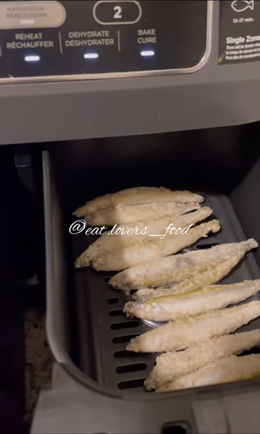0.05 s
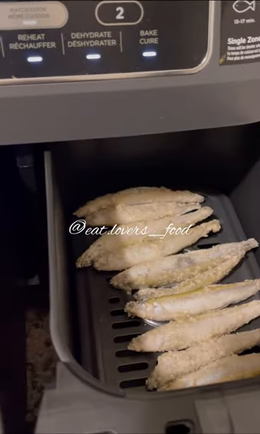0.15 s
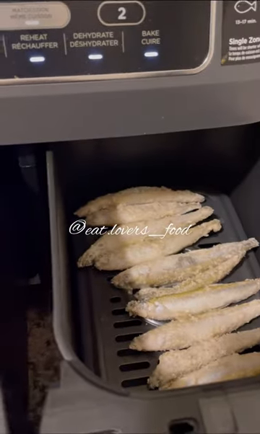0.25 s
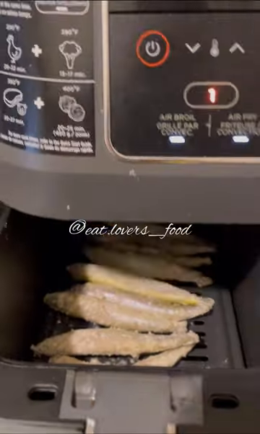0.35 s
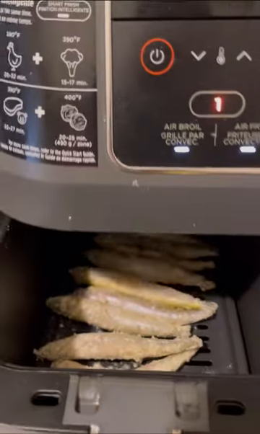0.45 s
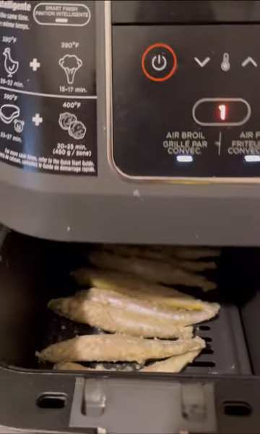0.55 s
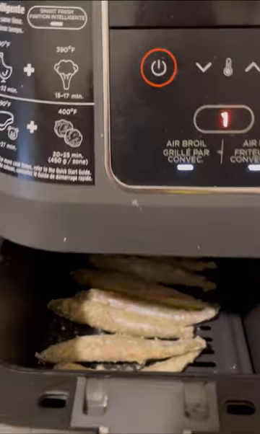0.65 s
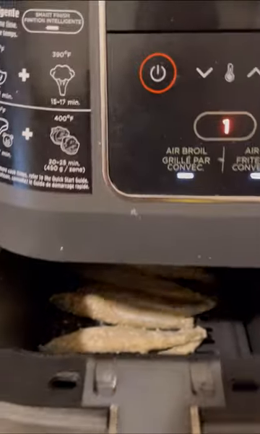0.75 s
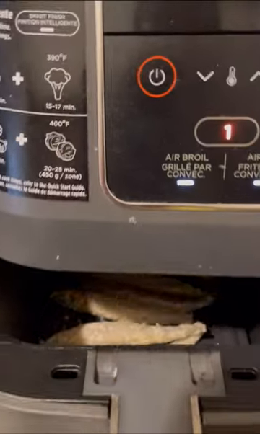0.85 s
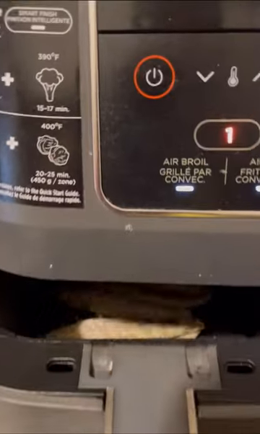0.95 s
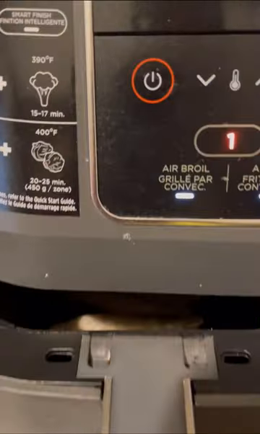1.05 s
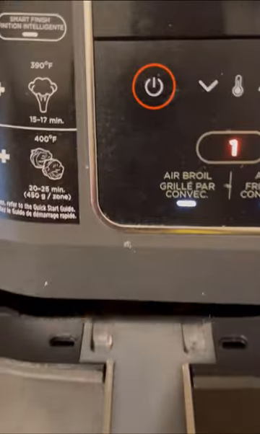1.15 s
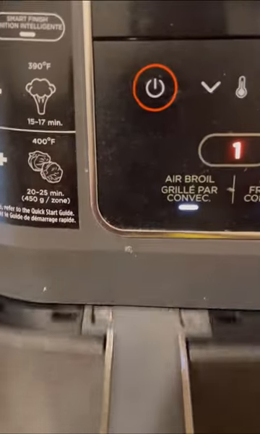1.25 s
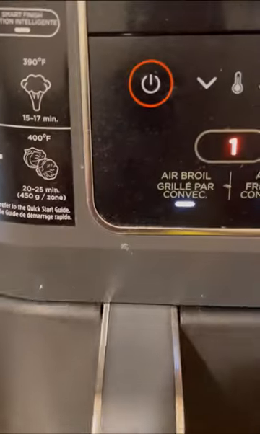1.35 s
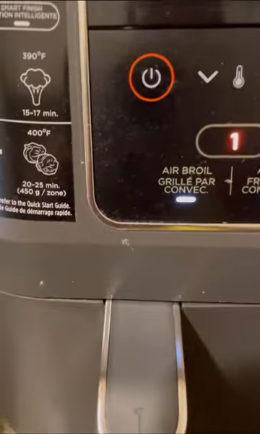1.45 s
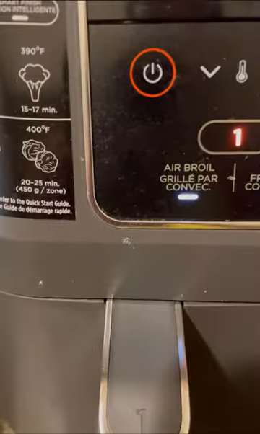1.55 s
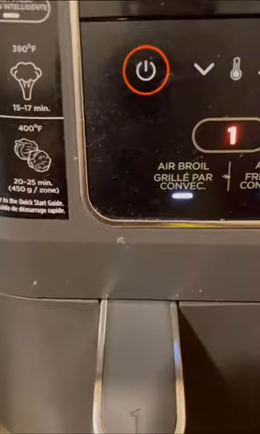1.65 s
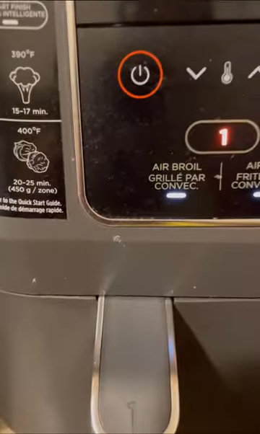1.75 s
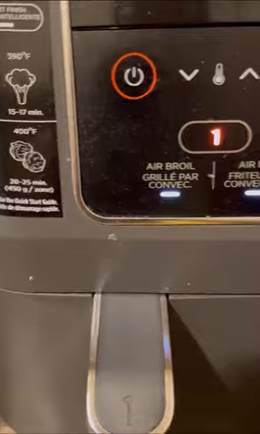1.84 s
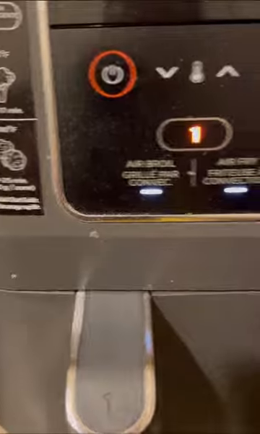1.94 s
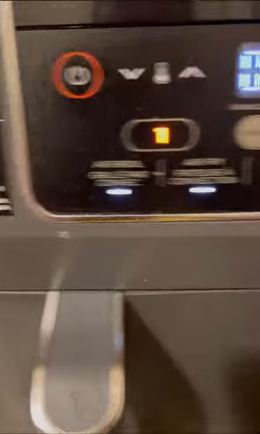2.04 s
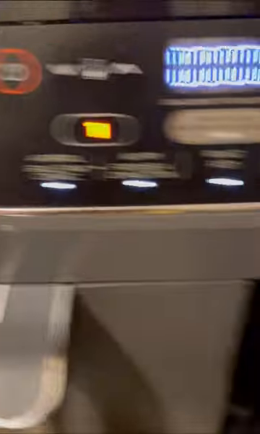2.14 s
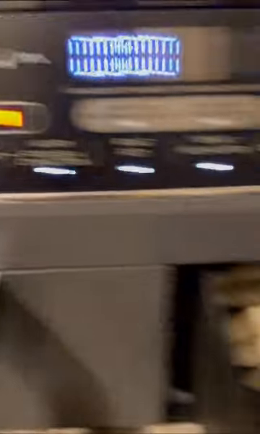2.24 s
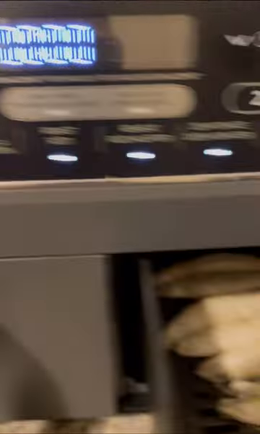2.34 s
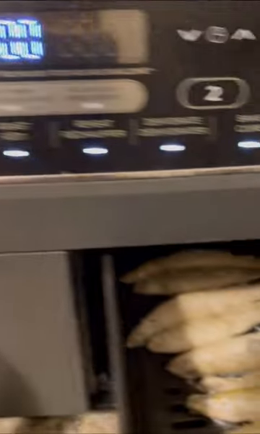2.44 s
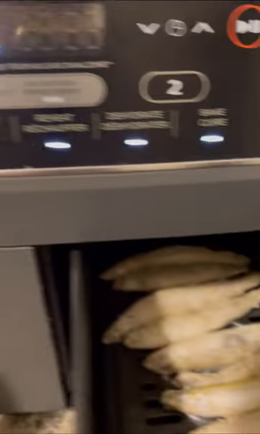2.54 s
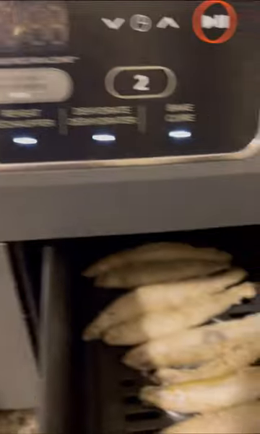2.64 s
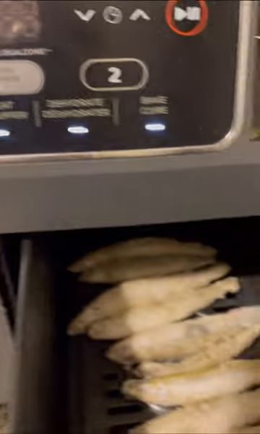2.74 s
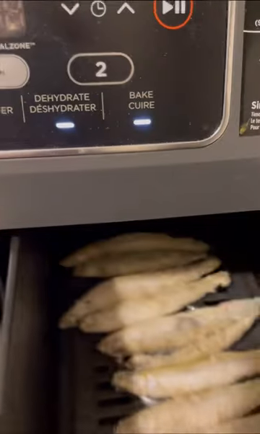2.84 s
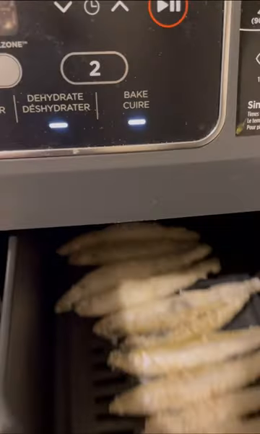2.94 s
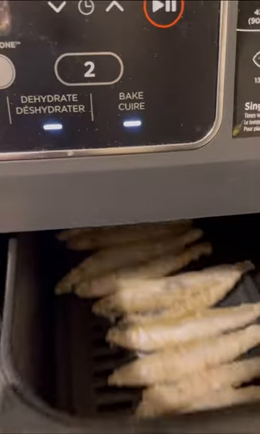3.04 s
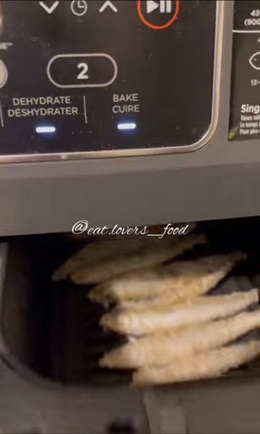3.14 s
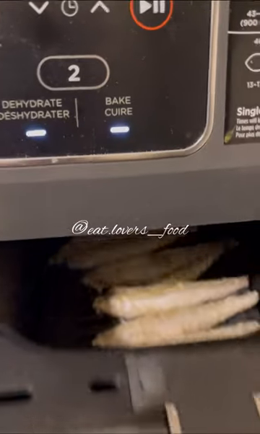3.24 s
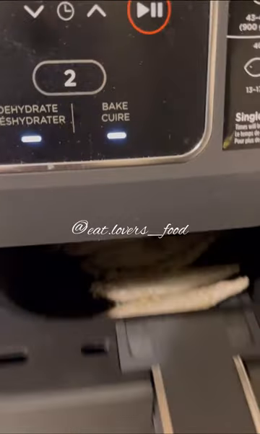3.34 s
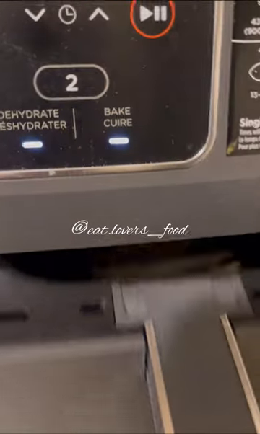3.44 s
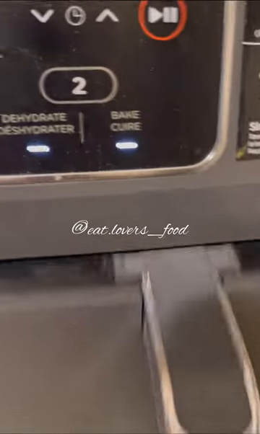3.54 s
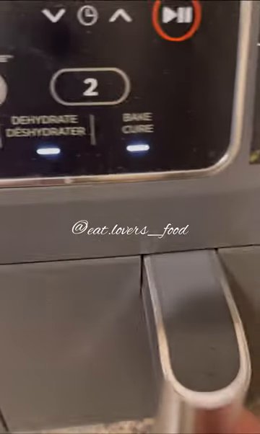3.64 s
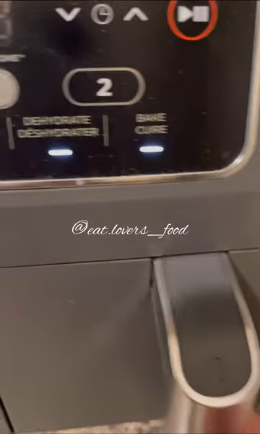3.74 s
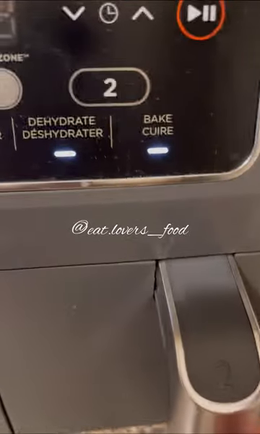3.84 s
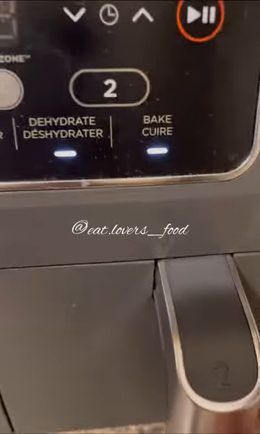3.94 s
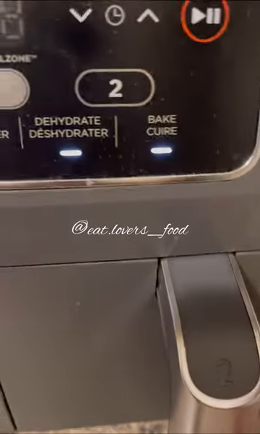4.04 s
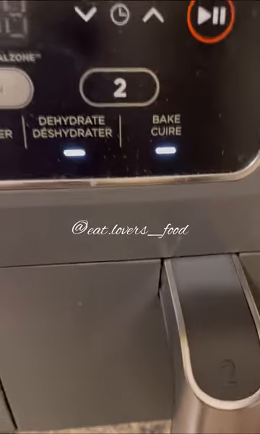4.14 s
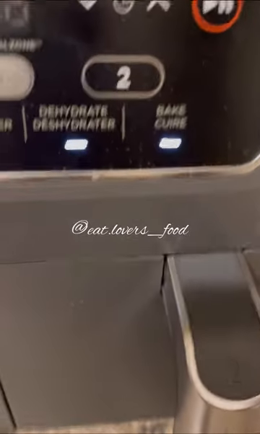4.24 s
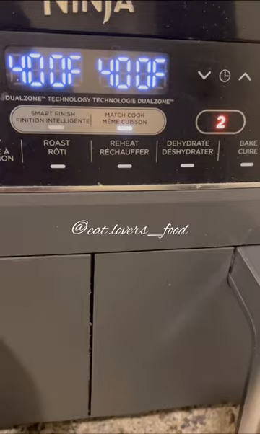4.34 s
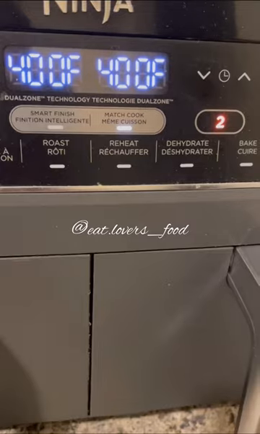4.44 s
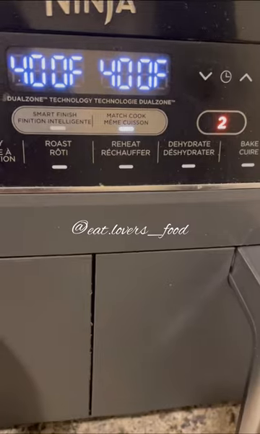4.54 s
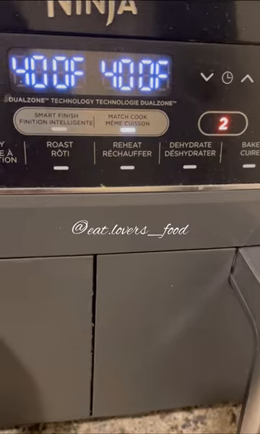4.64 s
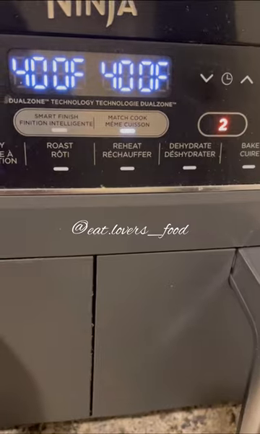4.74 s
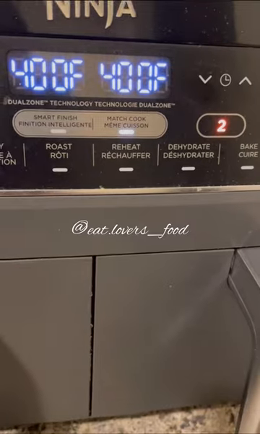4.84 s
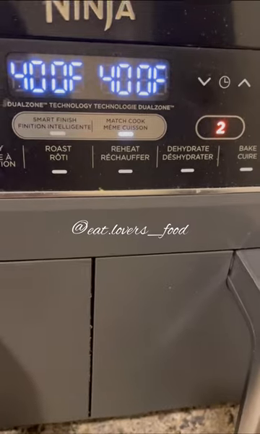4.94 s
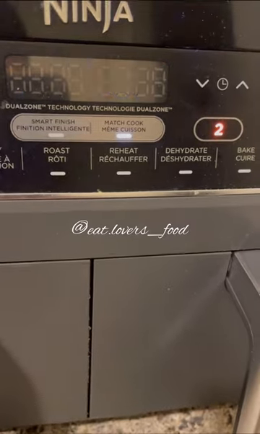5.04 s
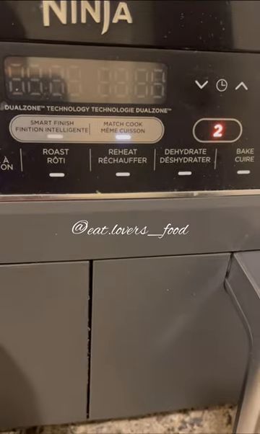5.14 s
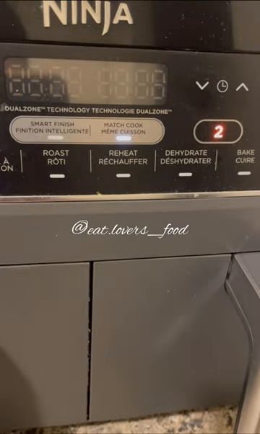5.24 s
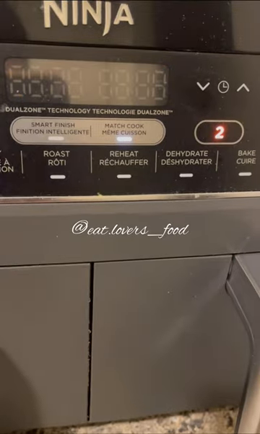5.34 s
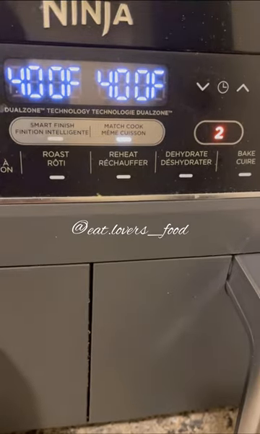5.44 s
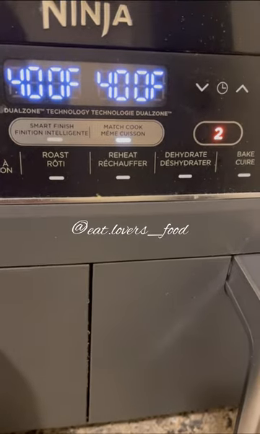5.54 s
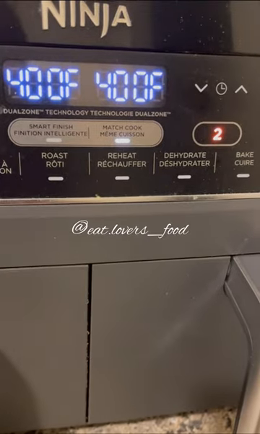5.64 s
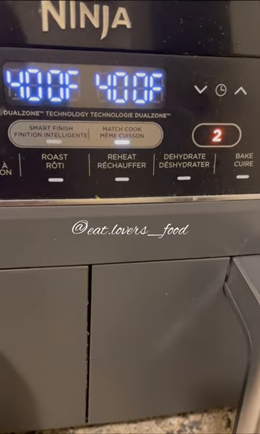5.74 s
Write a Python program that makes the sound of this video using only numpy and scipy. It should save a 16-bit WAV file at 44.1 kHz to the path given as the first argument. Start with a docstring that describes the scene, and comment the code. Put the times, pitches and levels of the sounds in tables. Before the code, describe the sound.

A soft slide and hollow clunk, a pause with faint rustling, then a louder scrape and heavier plastic thump over a fridge hum.

```python
"""Two plastic air fryer drawers slide along their rails and thump shut in a kitchen, close to a phone.
Contacts ring the damped modes of the hollow housing, with cracks, rattles and short damped tones.
Rail friction is shaped noise that also drives each drawer's resonances; a hand brushes the plastic.
A decaying noise tail gives the room's echo, over rumble, murmur and the steady partials of a fridge."""
import sys
import numpy as np
from scipy import signal
from scipy.fft import rfft, irfft, next_fast_len
from scipy.io import wavfile
from scipy.ndimage import uniform_filter1d, map_coordinates

SR = 44100
rng = np.random.default_rng(int(sys.argv[2]) if len(sys.argv) > 2 else 0)


def pcm_store(signal):
    """Save signal as 16-bit PCM."""
    levels = np.round(np.clip(np.atleast_2d(signal), -1, 1) * 32767)
    wavfile.write(sys.argv[1], SR, levels.astype(np.int16).T)


N = 255339

# relative spectrum of plastic rubbing on plastic: frequency_hz, density_db (per Hz)
FRICTION_SPECTRUM = [(400, -42), (1500, 4), (3000, 6.5), (5000, 4), (6500, 4.5), (8000, 4.5), (9500, 0.5),
                     (12000, -1.5), (14000, -5.5), (16000, -3.5)]


def amp(db):
    """Logarithmic level: decibels become an amplitude factor."""
    return 10 ** (np.asarray(db) / 20)


def unit(x):
    """Power normalization: the root mean square becomes 1."""
    return x / np.sqrt(np.mean(x ** 2) + 1e-20)


def along(points, hz):
    """Interpolation of (frequency, value) points on a logarithmic frequency axis."""
    f, v = np.transpose(points)
    return np.interp(np.log(hz + 1), np.log(f + 1), v)


def curves(rows):
    """Piecewise-linear levels in dB, one curve per column, at -150 dB outside the rows."""
    s, *columns = np.transpose(rows)
    t = np.arange(N) / SR
    return [np.interp(t, s, column, left=-150, right=-150) for column in columns]


def swells(rows):
    """Power addition of events that rise and fall exponentially; the times are per 20 dB."""
    t = np.arange(N) / SR
    power = 0
    for peak_s, db, rise, fall in rows:
        drop_db = 20 * np.where(t < peak_s, (peak_s - t) / rise, (t - peak_s) / fall)
        power = power + amp(db - drop_db) ** 2
    return np.sqrt(power)


def wobble(rate):
    """Slow random modulation: a smooth curve through random knots, rate of them a second."""
    knots = rng.standard_normal(int(N * rate / SR) + 4)
    return map_coordinates(knots, [np.arange(N) * rate / SR])


def filtered(x, response):
    """Linear filtering: the spectrum is multiplied by a complex frequency response."""
    m = next_fast_len(N + SR // 2)
    return irfft(rfft(x, m) * response(np.fft.rfftfreq(m, 1 / SR)), m)[..., :N]


def spectrum(points):
    """Spectral shaping: a gain response through (frequency, dB) points."""
    return lambda hz: amp(along(points, hz))


def resonances(modes):
    """Modal superposition: second-order band-pass resonances of alternating sign."""
    def response(f):
        total = 0
        for k, (centre, width, db) in enumerate(modes):
            mode = 1j * f * width / (centre * centre - f * f + 1j * f * width)
            total = total + (-1) ** k * amp(db) * mode
        return total
    return response


def noise(response, grain_db, patchy_db):
    """Two uncorrelated coloured noises under common modulation: fast roughness and random patches of gain."""
    rough = rng.standard_normal((2, N)) * amp(grain_db * wobble(300))
    z = signal.stft(rough, nperseg=512)[2]
    field = uniform_filter1d(rng.standard_normal(z.shape[1:]), size=2, axis=0)  # across frequency
    field = uniform_filter1d(field, size=12, axis=1)  # across time
    patchy = signal.istft(z * amp(patchy_db * unit(field)), nperseg=512)[1][:, :N]
    return unit(filtered(patchy, response))


def burst(t, low_hz, high_hz, t60):
    """Transient noise: two independent band-limited noises with a fast onset and exponential decay."""
    b, a = signal.butter(2, [low_hz, high_hz], "bandpass", fs=SR)
    band = signal.lfilter(b, a, rng.standard_normal((2, len(t))))
    return band * amp(-60 * t / t60) * (1 - np.exp(-t / 0.00024))


def bumps():
    """Impact excitation: each contact rings the housing modes nearest its pitch, with a crack and a rattle."""
    # contacts of drawer and housing; boom, clack and crack levels count from the knock:
    # start_s, knock_db, knock_pitch_hz, boom_db, clack_db, clack_pitch_hz, crack_db
    contacts = [(1.185, -32, 520, -18, -1, 790, -21.5), (1.193, -23, 281.7, -2, -27.5, 1505, -17),
                (1.211, -26.5, 296.8, 1, -20, 1600, -7.5), (1.261, -27, 297, -7.5, -11, 773, -8.5),
                (1.278, -18.5, 229, -8.5, -8.5, 1710, 5), (1.284, -12, 260.7, -10, -7, 701, -6.5),
                (1.289, -12.5, 332.6, -3.5, -16, 620, -4), (1.297, -17, 301.7, -4.5, -23, 788, -17.5),
                (1.304, -17, 339.6, -8, -11.5, 700, -16.5), (1.315, -21.5, 281.6, -6, -18, 700, -12.5),
                (1.332, -22, 296.5, -11.5, -19.5, 700, -18), (1.348, -26.5, 282.4, -12.5, -32.5, 1920, 9.5),
                (1.365, -17.5, 311.6, -6, -8.5, 782, 4.5), (1.371, -20, 279, -3, -23, 700, 0.5),
                (1.38, -16.5, 496, -7.5, 0, 1001, -2), (1.388, -14.5, 295.7, -3.5, -25, 1300, -10.5),
                (1.4, -8.5, 289.4, 2.5, -21, 798, -38), (1.427, -32, 240.6, 8.5, -5, 860, -15),
                (1.581, -50.5, 289, -7, -7.5, 1390, -3.5), (1.661, -39.5, 274, -9.5, -16.5, 705, -19),
                (2.831, -22, 316.5, -13.5, -26.5, 1154, -24), (2.942, -26, 376.4, -12.5, -30.5, 874, -7),
                (2.996, -24, 239.4, -2, -25, 1363, -12), (3.007, -33, 260, -7.5, -22, 900, -13),
                (3.019, -20, 272.5, -19.5, -23.5, 922, -18), (3.027, -25.5, 269.7, -11.5, -22, 900, -15),
                (3.077, -15, 324.4, -6.5, -13.5, 1174, -27), (3.088, -25, 280.6, -7.5, -13, 1400, -20),
                (3.096, -24, 260, -5.5, -18, 1300, -19), (3.103, -32.5, 270, -1, -11.5, 1206, 4),
                (3.145, -28.5, 484.5, -7.5, -7.5, 1300, -1), (3.186, -32, 262, -14.5, -16.5, 638, -24),
                (3.51, -35.5, 240.2, -12, -22.5, 655, -16.5), (3.522, -17.5, 431.6, -11.5, 2.5, 1230, -9),
                (3.532, -21.5, 481.5, 3, -7.5, 620, -20.5), (3.545, -19.5, 270, 2.5, -17.5, 693, -12.5),
                (3.566, -25, 301, -10.5, -1.5, 1900, 0), (3.571, -7, 339, -3, -5, 900, -3.5),
                (3.581, 0.5, 389.2, 1.5, -13, 610, -10.5), (3.594, -14, 430, -8.5, -16, 653, -22),
                (3.608, -15, 230.7, 6.5, -16.5, 700, 12.5), (3.634, -22.5, 312.4, -1, -7, 1233, -10),
                (3.639, -8.5, 288.8, 1, -8, 1200, -9.5), (3.646, -6.5, 256.6, -2.5, -6, 884, -13.5),
                (3.6524, -9, 269.4, -4.5, -15.5, 620, -20.5), (3.674, -19.5, 236.8, 1.5, -13.5, 700, -19.5),
                (3.75, -31.5, 236.4, 3.5, -21.5, 654, -15), (3.796, -36, 399, -6, -3.5, 1550, -3),
                (3.8, -17, 403.7, -4, -24, 694, -30), (3.8029, -12, 392.5, -11.5, -25.5, 697, -32),
                (3.811, -13, 377.6, -13.5, -11.5, 740, -38), (3.847, -37, 237.3, 8, -6.5, 843, -9.5),
                (3.874, -36.5, 238.6, 10.5, -10.5, 820, -33.5), (3.893, -44, 235, 6, -6, 628, -33)]
    # housing modes: frequency_hz, level_db, t60_s (at damping 1)
    housing = [(58, 0.5, 0.26), (75, 2.5, 0.42), (98.8, -1, 0.26), (133.4, 5.5, 0.24), (171.9, -4.5, 0.55),
               (235, 2.5, 0.041), (268.9, 5, 0.1), (309.5, 2.5, 0.075), (408.4, 3, 0.084), (468, 1, 0.096),
               (509, -5.5, 0.28), (602, 7.5, 0.087), (800, 3.5, 0.015), (883, 4, 0.034),
               (1220, -2.5, 0.077), (1240, -11.5, 0.048), (1480, -3, 0.059), (1580, -1, 0.065),
               (1707, -5.5, 0.14), (2020, -6.5, 0.057)]
    # boom pitch of the drawer cavity as the drawers seat: time_s, pitch_hz
    cavity = [(1.2, 90), (1.37, 136), (1.6, 138), (2.8, 105.5), (3.15, 109.5), (3.5, 140), (3.68, 134),
              (3.81, 125), (3.87, 105.6)]
    # blows harder than soft_db press the parts together and ring shorter
    soft_db, base_damping, damping_per_db = -20.5, 0.85, 0.2053
    # cracks stronger than dull_db snap higher
    dull_crack_hz, dull_db, snap_db_per_octave = 2830, -4, 15
    rattle_db = 12  # over the clack
    # random spread of mode level and pitch from contact to contact
    scatter_db, detune = 1.5, .004  # detune as a fraction of frequency

    out, t = np.zeros((2, N + SR)), np.arange(SR // 3) / SR
    hz, mode_db, t60 = np.transpose(housing)[:, :, None]
    alternating = (-1.) ** np.arange(len(hz))[:, None]
    sign = np.where((hz > 200) & (hz < 550), -1, alternating)  # the panel modes start together
    build = sign * (1 - np.exp(-t * hz / 0.41))  # a soft blow builds within a cycle

    def near(centre_hz, fall_db):
        """Selective excitation: modes away from the struck pitch answer less."""
        return -fall_db * np.log2(hz / centre_hz) ** 2

    for s, knock_db, knock_hz, boom_db, clack_db, clack_hz, crack_db in contacts:
        boom_hz = np.interp(s, *np.transpose(cavity))
        crack_hz = dull_crack_hz * 2 ** (max(crack_db - dull_db, 0) / snap_db_per_octave)
        damping = base_damping + damping_per_db * max(knock_db - soft_db, 0)
        boom = boom_db + near(boom_hz, 75)
        knock = near(knock_hz, 46)
        clack = clack_db + near(clack_hz, 18.0)
        part_db = np.where(hz < 200, boom, np.where(hz < 550, knock, clack))[:, 0]
        spread_hz = hz * (1 + detune * rng.standard_normal(hz.shape))
        swing = build * np.sin(2 * np.pi * spread_hz * t)
        ring = swing * amp(mode_db - 60 * t * damping / t60)
        body = amp(part_db + scatter_db * rng.standard_normal((2, len(hz)))) @ ring
        crack = amp(crack_db) * burst(t, crack_hz / 1.25, crack_hz * 1.34, 0.032)
        # the loose tray shakes on
        rattle = amp(clack_db + rattle_db) * burst(t, clack_hz / 2.2, clack_hz * 1.27, 0.1 / damping)
        start = round(s * SR)
        out[:, start:start + len(t)] += amp(knock_db) * (body + crack + rattle)
    return out[:, :N]


def chirps():
    """Free vibration: each tone is one damped mode whose pitch may bend as it starts."""
    # short damped tones of clacks, chirps and taps: start_s, level_db, pitch_hz, t60_s, bend_octaves
    short_tones = [(1.323, -34, 3960, 0.028, 0), (1.355, -30.5, 3900, .022, 0),
                   (1.37, -29, 4570, .03, -0.13), (1.38, -8.5, 626, .035, 0.34),
                   (1.38, -9.5, 1420, 0.027, -0.11), (1.388, -16, 1490, 0.02, -0.058),
                   (3.026, -39, 3570, .04, 0.12), (3.04, -39.5, 2780, 0.093, -0.15),
                   (3.109, -29.5, 4630, 0.04, 0.066), (3.114, -29, 2660, 0.028, -0.29),
                   (3.125, -31, 2620, .025, -0.27), (3.133, -37, 2650, .025, 0.11),
                   (3.143, -36, 3500, .03, 0), (3.151, -30, 2215, 0.044, 0),
                   (3.523, -15.5, 935, 0.033, 0.1), (3.573, -15, 1800, .03, 0.091),
                   (3.577, -26.5, 4050, .018, 0), (3.609, -30, 2917, 0.034, 0),
                   (3.795, -29, 1630, 0.031, -0.21), (3.856, -48.5, 2940, 0.025, -0.14),
                   (4.186, -38.5, 674, 0.041, 0.7), (4.271, -55.5, 820, 0.048, -.2)]
    rise_s, bend_s = 0.0013, 0.0015
    out, t = np.zeros(N + SR), np.arange(SR // 8) / SR
    for s, db, hz, t60, bend in short_tones:
        cycles = np.cumsum(hz * 2 ** (bend * np.exp(-t / bend_s))) / SR
        envelope = amp(db - 60 * t / t60) * (1 - np.exp(-t / rise_s))
        start = round(s * SR)
        out[start:start + len(t)] += envelope * np.sin(2 * np.pi * cycles)
    return out[:N]


def slides():
    """Friction excitation: grit hisses on the rails and the same drag drives the drawer's resonances."""
    # sliding, a list for each drawer: time_s, hiss_db
    glides = [
        [(0.34, -95), (0.372, -61.5), (0.41, -58), (0.47, -53.5), (0.6, -54), (0.7, -52.5), (0.826, -58),
         (1.24, -56.5), (1.39, -53), (1.44, -81)],
        [(2.76, -84.5), (2.795, -58), (2.842, -47), (2.99, -45), (3.056, -47.5), (3.236, -47), (3.32, -43.5),
         (3.566, -46.5), (3.656, -53.5), (3.72, -73)],
    ]
    # harder grinding at the catches, a list for each drawer: peak_s, hiss_db, rise_s, fall_s (per 20 dB)
    catches = [
        [(1.252, -43.5, 0.02, 0.045), (1.282, -33, 0.016, 0.1), (1.358, -30.5, 0.028, 0.033)],
        [(3.014, -40.5, .08, .07), (3.108, -37, .04, 0.088), (3.15, -44, .04, 0.16), (3.574, -28, .012, 0.03),
         (3.612, -31.5, .04, 0.046)],
    ]
    # resonances over the hiss while gliding: level_db, one for each drawer
    glide_body_db = [8, 6.5]
    # resonances, a list for each drawer: frequency_hz, width_hz, level_db
    baskets = [
        [(103, 42, -12), (240, 82, 1), (438.5, 270, -3), (657, 370, -6), (876, 150, -5), (1374, 170, -9.5),
         (1753, 120, -12.5), (2350, 170, -12.5), (2960, 18, -13), (4150, 200, -17.5), (5220, 200, -21)],
        [(110, 150, -8), (243, 26, 5.5), (443, 63, -2.5), (640, 295.5, -12.5), (844, 150, -8), (1287, 180, -12),
         (1670, 110, -14.5), (2160, 44, -16.5), (2637, 130, -21), (3460, 140, -25), (6600, 480, -28.5)],
    ]
    grind_body_db = 7  # resonances over the hiss while grinding
    slips_per_s, slip_db = 300, -7.5  # tiny slips on the rails; level over the gliding resonances

    out = np.zeros((2, N))
    for rows, grinds, body_db, basket in zip(glides, catches, glide_body_db, baskets):
        glide, grind = amp(curves(rows)[0]), swells(grinds)
        drag_db = 0.72 * wobble(25)  # uneven push
        hiss = noise(spectrum(FRICTION_SPECTRUM), grain_db=-0.5, patchy_db=2.5)
        out += np.hypot(glide, grind) * amp(2.0 * drag_db) * hiss
        body_gain = np.hypot(amp(body_db) * glide, amp(grind_body_db) * grind)
        out += body_gain * amp(drag_db) * noise(resonances(basket), grain_db=0.0, patchy_db=2.27)
        moments = rng.random(N) < slips_per_s / SR
        strength = rng.choice([-1, 1], size=N) * amp(2.7 * rng.exponential(size=N))
        slips = unit(filtered(moments * strength, resonances(basket)))
        out += amp(slip_db + body_db) * glide * slips
    return out


def brushes():
    """Light friction: a hand moving over the front makes a soft noise-like rustle."""
    # hand and sleeve on the plastic: peak_s, level_db, rise_s, fall_s (per 20 dB)
    strokes = [(1.585, -65, 0.015, 0.19), (1.654, -56.5, .06, 0.032), (1.9, -67.5, 0.46, .6),
               (2.202, -58.5, .035, 0.24), (2.522, -66, 0.21, .2), (3.828, -52.5, .04, 0.0467),
               (3.858, -56.5, 0.0085, 0.025), (4.318, -67.5, 1.3, 0.012)]
    return swells(strokes) * noise(spectrum(FRICTION_SPECTRUM), grain_db=-2.5, patchy_db=3.5)


def kitchen(x):
    """Reverberation: convolution with noise whose strength and decay time depend on frequency."""
    # room answer: frequency_hz, t60_s, echo_db
    room = np.array([(100, 1, -2), (400, 0.61, -0.5), (1489, 0.27, 3), (4000, 0.17, 3.5),
                     (9750, 0.26, -8.5)])
    hz, t, z = signal.stft(rng.standard_normal((2, SR)), SR, nperseg=256)
    t60 = along(room[:, [0, 1]], hz)[:, None]
    echo_db = along(room[:, [0, 2]], hz)[:, None]
    decay = amp(echo_db - 60 * t / t60) / np.sqrt(t60 * SR / 28)  # long decays are not louder overall
    tail = signal.istft(z * decay, SR, nperseg=256)[1]
    delayed = np.pad(x, ((0, 0), (300, 0)))  # delay in samples
    return signal.fftconvolve(delayed, tail, axes=1)[:, :N]


def fridge():
    """Additive synthesis: compressor partials and two cabinet hums waver slightly in level and phase."""
    # compressor tones: multiple of the motor speed
    multiples = [1, 3, 8, 11, 18, 35, 36, 37, 39, 43, 49, 50, 57, 58, 63, 69, 70, 71, 72, 73, 74, 76, 81,
                 84, 88, 90, 91, 100, 103]
    # their levels before wavering: level_db
    tone_db = [-57, -65, -71, -72.5, -78.5, -82, -84, -78.5, -83, -93.5, -92, -90.5, -85.5, -86, -87, -87.5,
               -87, -76.5, -76, -97.5, -94.5, -90.5, -92, -94, -87.5, -87, -83.5, -91.5, -86.5]
    # hums off the motor's series: frequency_hz, level_db
    cabinet = [(96.9, -63.5), (285.3, -70.5)]
    # wavering of the whole hum: time_s, level_db
    wavering = [(0, -2.5), (1.9, 0.5), (2.3, -1.5), (2.8, 0), (4.4, 1.34)]
    motor_hz = 59.19
    t = np.arange(N) / SR
    tones = [(k * motor_hz, db) for k, db in zip(multiples, tone_db)] + list(cabinet)
    phases = rng.uniform(0, 2 * np.pi, (len(tones), 2, 1))
    hum = np.zeros((2, N))
    for (hz, db), phase in zip(tones, phases):
        gain = amp(db + 1.7 * wobble(8.0))
        wander = hz / 4000 * wobble(30)  # radians
        hum += gain * np.sin(2 * np.pi * hz * t + phase + wander)
    return hum * amp(np.interp(t, *np.transpose(wavering)))


def background():
    """Stationary noise in two bands, rumble and murmur, joins the fridge; the level dips briefly."""
    # kitchen air: time_s, rumble_db, murmur_db
    air = [(0, -52.5, -62.5), (.35, -54, -61), (1.7, -52, -65.5), (2.2, -53, -68.5), (2.7, -53, -66.5),
           (4, -51.5, -66), (4.32, -53, -63.5), (4.5, -54, -63.5), (5.79, -53, -65.5)]
    # relative rumble spectrum: frequency_hz, density_db (per Hz)
    rumble_spectrum = [(12, -43), (20, -28.5), (49, -6.5), (102, -6.5), (145, -15.5), (183, -24.5),
                       (329, -8), (400, -23), (450, -33), (580, -48.5), (990, -120)]
    # relative murmur spectrum: frequency_hz, density_db (per Hz)
    murmur_spectrum = [(300, -32.5), (500, 2.5), (700, 1.5), (900, -4.5), (1100, -2.5), (1600, -12.5),
                       (2500, -20), (4200, -29), (6500, -23.5), (9000, -37), (12000, -27), (16000, -41)]
    # brief dips to silence: time_s, fall_s, return_s
    dips = [(0.356, 0.002, 0.005), (4.327, 0.0022, 0.0125)]
    t = np.arange(N) / SR
    rumble_db, murmur_db = curves(air)
    rumble = noise(spectrum(rumble_spectrum), grain_db=-0.36, patchy_db=2.5)
    rumble *= amp(rumble_db + 1.2 * wobble(6))
    murmur = noise(spectrum(murmur_spectrum), grain_db=0.5, patchy_db=1.4)
    murmur *= amp(murmur_db + 0.28 * wobble(6.8))
    gate = np.ones(N)
    for s, fall, back in dips:
        gate *= 1 - np.exp(-((t - s) / np.where(t < s, fall, back)) ** 2)
    return gate * (rumble + murmur + fridge())


def ports(pair, alike):
    """Interchannel coherence: two unrelated versions mix into left and right of the given likeness."""
    def mix(hz):
        turn = np.arccos(np.clip(along(alike, hz), 0, 1)) / 2
        return np.array([np.cos(turn), np.sin(turn)])
    both, apart = filtered(pair, mix)
    return np.array([both + apart, both - apart])


def scene():
    """Superposition of direct and diffuse fields: drawers close by, echo and background all round."""
    # left-right likeness of close sound: frequency_hz, likeness (1 = identical)
    near_likeness = [(300, 1), (700, 0.86), (2000, 0.93), (3000, 0.2), (5300, 0.05), (6900, 0.98),
                     (16000, 1)]
    # left-right likeness of surrounding sound: frequency_hz, likeness (1 = identical)
    far_likeness = [(100, 1), (300, 0.94), (600, 0.067), (2500, 0.11), (5300, 0.13), (6900, 1), (16000, 1)]
    drawers = bumps() + chirps() + slides()
    close = ports(drawers + brushes(), near_likeness)
    around = ports(amp(-17) * kitchen(drawers) + background(), far_likeness)
    return close + around


def record(dry):
    """Linear response, then saturation: left and right differ in level and phase; the band is limited."""
    # left over right: frequency_hz, level_db
    louder_left = [(60, .3), (300, 1.1), (700, 3.5), (1300, 3), (2400, 0), (16000, 0)]
    # stepped left-right phase in the treble: frequency_hz, lead_half_cycles
    treble_phase = [(5200, 0), (7000, 1), (8200, 1), (10200, 2), (12000, 2), (13400, 3), (15500, 3)]
    top_hz, bass_cut_hz = 15750, 30

    def response(hz):
        # each side takes half of the difference
        half = amp(along(louder_left, hz) / 2) * np.exp(.5j * np.pi * along(treble_phase, hz))
        bass_cut = (1j * hz / (bass_cut_hz + 1j * hz)) ** 2
        return np.array([half, 1 / half]) * bass_cut

    heard = filtered(dry, response)
    squeezed = heard / (1 + np.abs(heard / .95) ** 6) ** (1 / 6)  # the loudest peaks round off
    return filtered(squeezed, lambda hz: hz < top_hz)


dry = scene()
out = record(dry)
pcm_store(out)
```